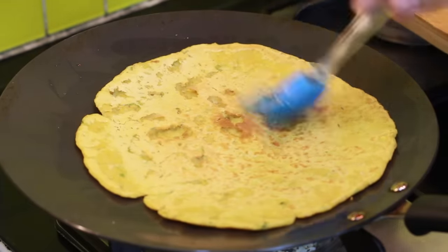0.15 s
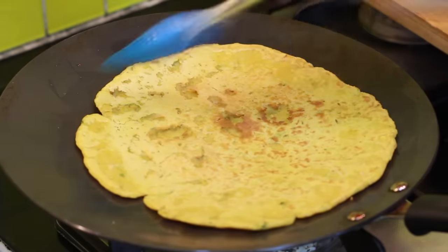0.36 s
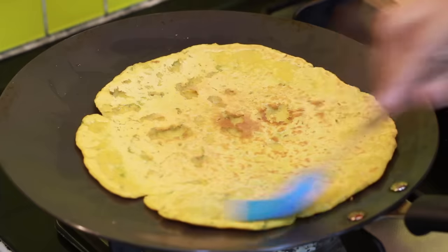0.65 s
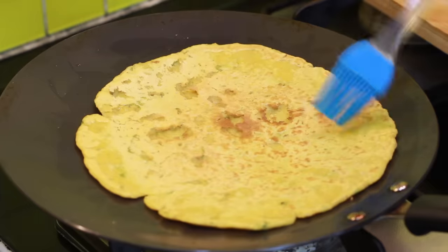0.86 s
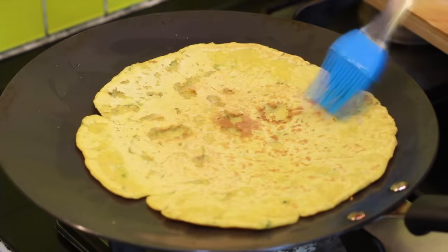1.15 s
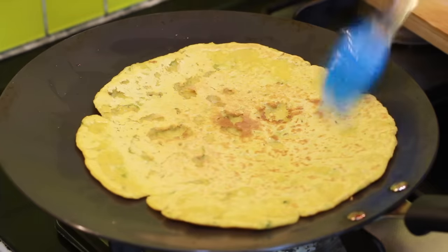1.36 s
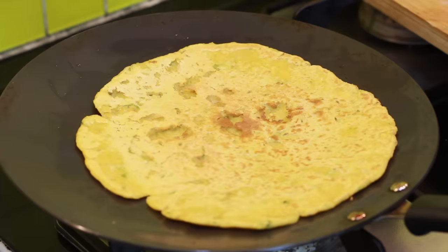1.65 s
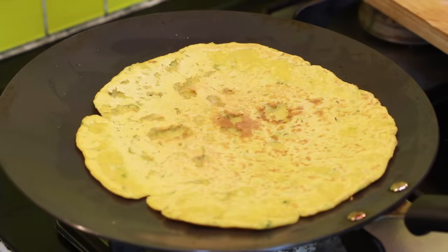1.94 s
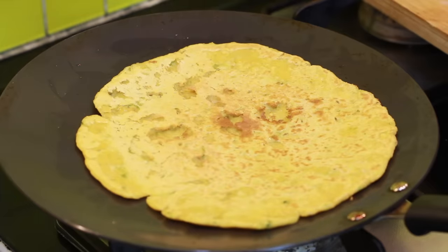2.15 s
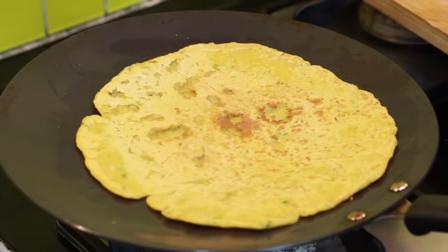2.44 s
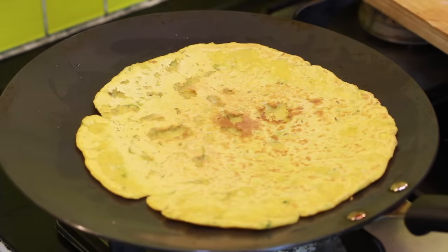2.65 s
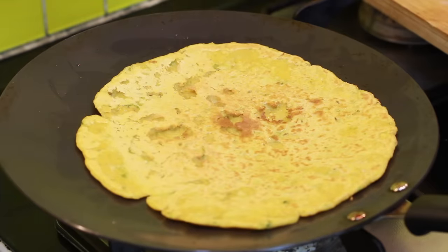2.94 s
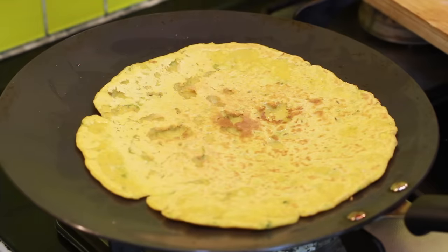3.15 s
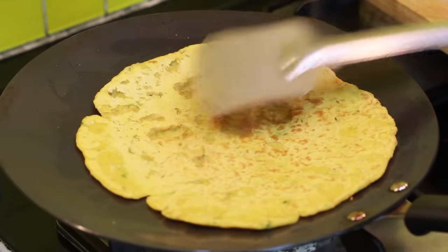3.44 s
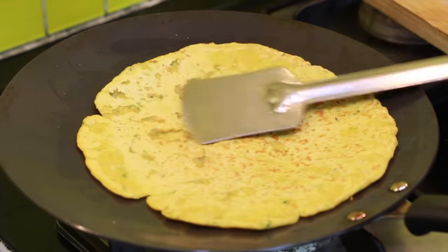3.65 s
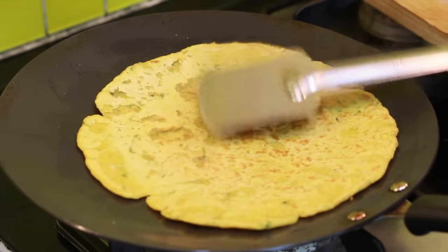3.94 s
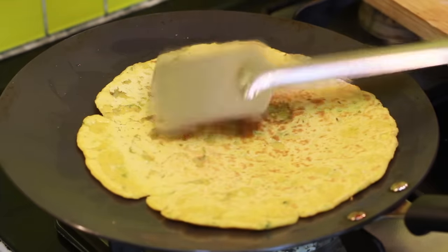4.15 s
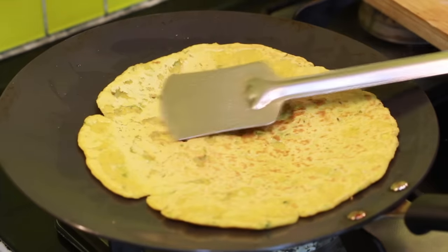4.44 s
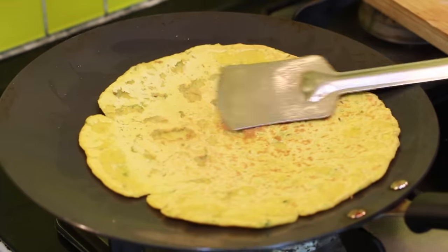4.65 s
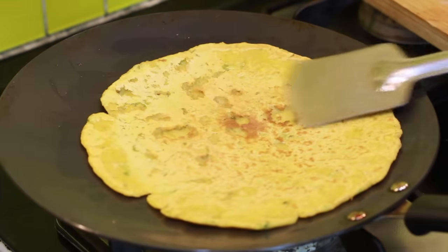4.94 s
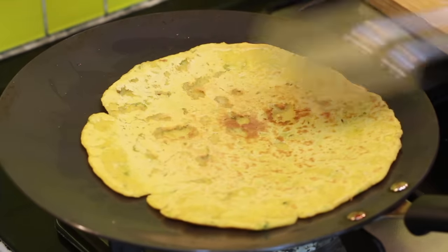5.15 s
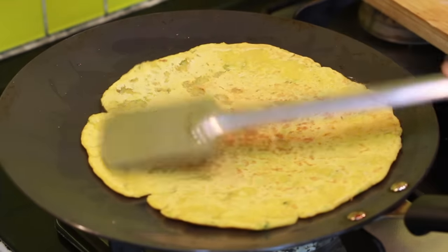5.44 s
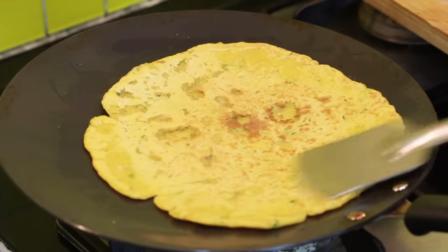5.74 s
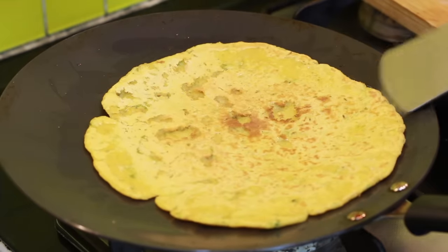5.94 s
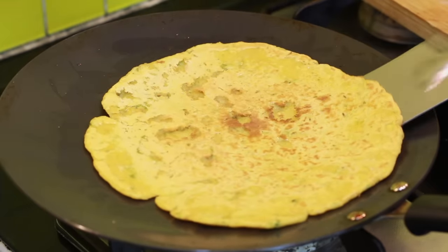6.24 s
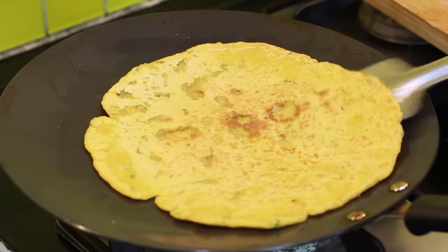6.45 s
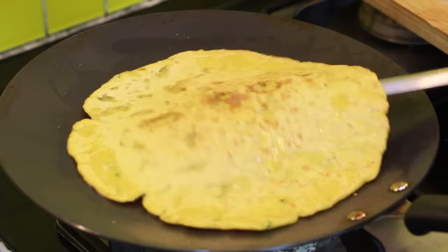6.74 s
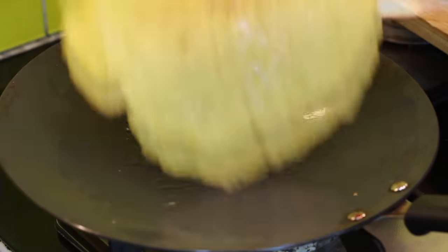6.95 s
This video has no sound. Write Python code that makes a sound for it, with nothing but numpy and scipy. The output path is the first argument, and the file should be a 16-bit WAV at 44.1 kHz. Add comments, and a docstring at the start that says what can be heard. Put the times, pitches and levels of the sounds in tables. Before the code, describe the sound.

Flatbread sizzles softly on an iron griddle; a brush clatters down, a press bursts into harsh overloaded pops, then a steel turner clinks and scrapes.

```python
"""In a kitchen, at a gas stove, flatbread fries on an iron griddle: bursting bubbles make a coloured fizz.
A silicone brush swishes oil on and is put down with a clatter; each blow excites decaying modes.
A steel turner presses the bread: it sizzles and the griddle rocks on its grate; bursts of hiss swell and
cut off, with pops that overload the microphone. The turner then hits the iron and scrapes in
under the bread by stick-slip; random reflections and the burner's noise surround it all."""
import sys
import numpy as np
from scipy import signal
from scipy.fft import rfft, irfft, next_fast_len
from scipy.io import wavfile

SR = 44100
rng = np.random.default_rng(int(sys.argv[2]) if len(sys.argv) > 2 else 0)


def wav_out(sig):
    """Save sig, one row per channel (or a flat mono array), as 16-bit PCM at SR to the path in sys.argv[1]."""
    wavfile.write(sys.argv[1], SR, np.round(np.clip(np.atleast_2d(sig).T, -1, 1) * 32767).astype(np.int16))


N = 312228
TIME = np.arange(N) / SR  # seconds

# Levels are relative: the sources and the room apply further gains. Every spectrum is a density.
# Presses of brush or turner on the bread: [peak_s, level_db, rise_s]
BREAD_PRESSES = [(.48, -57, 0.46), (3.6, -49.5, 0.12), (3.8, -53.5, 0.14), (3.99, -49, 0.13),
                 (4.22, -48, 0.075), (4.45, -50, 0.42), (4.66, -49.5, 0.062), (5.16, -57, 0.17),
                 (5.81, -56, 0.17), (6.3, -58, 0.46), (6.72, -60, .13)]
SIZZLE_FALL = 1.29  # a sizzle dies away this many times slower than it rises
# Spectrum of the frying: [frequency_hz, density_db]
SIZZLE_SPECTRUM = [(24, -35), (40, -7), (126, -4), (188, -1), (260, -2.5), (377, -8.5), (577, -4),
                   (1050, -9.5), (1250, -7.5), (1600, -11.5), (15500, -17)]

# Bursts of hiss that swell and cut off: [end_s, level_db, swell_db_per_s]
HISS_BURSTS = [(0.786, -37, 378), (1.064, -44, 350), (4.75, -21.5, 1494), (4.803, -17, 239)]
# Spectrum of the hiss: [frequency_hz, density_db]
HISS_SPECTRUM = [(60, 1), (400, 4.5), (1500, -0.5), (4000, -3.5), (9000, -5.5), (15500, -5.5)]

# Pressure pops at the microphone: [start_s, height_db, length_ms]
PRESSURE_POPS = [(.7837, -22, 0.35), (1.0644, -18, .41), (4.7286, -6, 0.21), (4.7477, 5, 0.93),
                 (4.7583, -8, 0.54), (4.7662, 13, 2.67), (4.778, 9.5, 0.35), (4.7860, 8.5, 3.77),
                 (4.7973, 12.5, 1.53), (4.8011, 6, 1.1)]
# Spectrum of the noise within a pop: [frequency_hz, density_db]
EDDY_SPECTRUM = [(300, -2), (900, 2.5), (1280, 8.5), (1700, 0.5), (4000, -4.5), (9000, -9), (15000, -13)]
# share of the height in a 1 ms pop; longer pops are more turbulent by this power
TURBULENCE, TURBULENCE_GROWTH = 0.52, 0.21

# Knocks of the griddle rocking on its grate: [start_s, level_db]
GRIDDLE_KNOCKS = [(3.832, -21), (4.459, -16), (4.479, -15), (4.539, -18.5), (4.555, -16.5), (4.612, -21.5),
                  (4.62, -24), (4.679, -25), (4.84, -23.5), (4.897, -28.5), (4.931, -28.5), (4.963, -33.5)]
# a knock loses this many dB per octave of treble for each dB under full strength
ROCK_FULL_DB, ROCK_DULLING = -12.5, 0.36
# Modes of the iron griddle: [frequency_hz, level_db, t60_s]
GRIDDLE_MODES = [(599, -4, 0.25), (904, 1, 0.1), (1439, -6, 0.17), (2240, 1.5, 0.13), (2830, 0, 0.063),
                 (3166, 6, 0.071), (3970, -1.5, 0.073), (4290, -4, 0.11), (5070, 9, 0.052),
                 (5700, -12, 0.087), (7320, -22, .2)]
# Spectrum of a knock: [frequency_hz, density_db]
KNOCK_SPECTRUM = [(50, 6), (250, -1), (900, 2), (1800, -7), (3300, 3.5), (5000, -4), (8000, -6.5),
                  (15000, -22)]

# The turner's edge meets the iron: [start_s, level_db, brightness_db_per_octave]
EDGE_STRIKES = [(5.521, -39, -1), (5.547, -38, -12), (5.576, -32, -6.5), (6.0438, -24, 1),
                (6.0495, -17.5, -0.5), (6.502, -37, 4), (6.836, -38, 4), (6.862, -42, -6)]
# Modes of the steel blade: [frequency_hz, level_db, t60_s]
BLADE_MODES = [(550, 3.5, 0.15), (948, -1, 0.16), (1190, -1.5, 0.19), (2054, -1, 0.24), (2163, -6, .25),
               (4770, 7, 0.16), (5440, -1, 0.086), (7550, 3, 0.19), (7800, -5.5, 0.096), (9065, -21, .3),
               (9900, 2, .14), (10500, -5, .14)]
# Spectrum of a strike: [frequency_hz, density_db]
STRIKE_SPECTRUM = [(35, 5.5), (90, -13), (300, -19), (560, -8), (850, 2), (1050, -22), (1300, -6),
                   (1700, -10), (3000, -8), (5900, -9), (7600, -6), (15500, -14.5)]

# The turner is shoved in under the bread: [peak_s, level_db, rise_s]
TURNER_SHOVES = [(6.283, -39, .022), (6.335, -44.5, .03), (6.533, -39.5, 0.021), (6.581, -39, 0.021),
                 (6.658, -37.5, 0.044)]
SHOVE_FALL = 1.48  # a shove dies away this many times slower than it rises
# Resonances of the sliding blade: [frequency_hz, width_hz, level_db]
SLIDING_MODES = [(1300, 120, -12), (1850, 110, -7), (2060, 150, 3), (2380, 200, -6), (2660, 200, 1),
                 (3260, 260, -1), (3620, 200, -10), (4730, 200, -12), (5680, 400, -13)]
# Resonances of the blade as it skims: [frequency_hz, width_hz, level_db]
SINGING_MODES = [(760, 120, -3), (1949, 90, -3), (4400, 250, -14), (7343, 80, -4), (8400, 300, -14),
                 (9065, 90, -2), (10837, 250, -11)]
# Spectrum of the edge's dry rasp: [frequency_hz, density_db]
GRIT_SPECTRUM = [(500, -27), (2200, -10), (3200, -1), (4300, 0), (5500, 0), (7000, -0.5), (9800, -6.5),
                 (11200, -7), (15000, -13)]
# when the blade lies down on the iron; the gain of its lowest modes before and after
BITE_S, BITE_RISE_S, SKIMMING_DB, BITING_DB = 6.565, 0.012, -18, 3
# the blade skims the bread in one sweep
SKIM_START_S, SKIM_END_S, SKIM_RISE_S, SKIM_RELEASE_S, SKIM_DB = 5.56, 6.104, .08, 0.23, -53

# Bristles swish over the dough: [peak_s, level_db]
BRISTLE_SWISHES = [(.176, -46), (.524, -46)]
SWISH_S, SWISH_HZ, SWISH_OCTAVES = .15, 1180, 0.47
# The flat blade pats the dough: [peak_s, level_db]
BLADE_PATS = [(3.561, -56), (3.957, -40.5), (5.176, -48.5)]
PAT_S, PAT_HZ, PAT_OCTAVES = 0.098, 172, 0.41
SLAP_S, SLAP_HZ, SLAP_OCTAVES, SLAP_DB = .18, 740, 0.72, -8  # the lighter slap that goes with each pat
# The bread drags over the blade: [peak_s, level_db, length_s, centre_hz]
BREAD_DRAGS = [(6.26, -51, 0.16, 1370), (6.625, -46.5, .072, 764)]
DRAG_OCTAVES = 0.4

# The brush is put down in a steel bowl: [start_s, level_db, brightness_db_per_octave]
BRUSH_CLACKS = [(2.2663, -32.5, -13), (2.299, -40, -14), (2.362, -20.5, -4), (2.3764, -36, -14),
                (2.441, -14.5, 3), (2.4472, -26, -8), (2.4823, -30, -2), (2.4943, -20.5, -3),
                (2.5251, -27, 1), (2.586, -33.5, -4)]
# Modes of the brush's plastic handle (near 1.8-2.4 kHz) and of the steel bowl (above 4 kHz): [frequency_hz,
# level_db, t60_s]
CLATTER_MODES = [(1853, 10.5, 0.086), (1950, -5, 0.072), (2260, 2, 0.078), (2326, -12, 0.14), (4740, -5, 0.15),
                 (6340, -9, 0.13)]
# Spectrum of a clack: [frequency_hz, density_db]
CLACK_SPECTRUM = [(40, -6), (200, -30), (750, -14), (1600, -5.5), (1900, 7.5), (2400, 5.5), (2750, -7),
                  (3300, -2), (4300, -7.5), (6500, -13.5), (7900, -12), (9800, -21), (11200, -16),
                  (15500, -26)]

# Dull bumps on the worktop: [start_s, level_db, brightness_db_per_octave]
WORKTOP_BUMPS = [(3.058, -36, -3), (3.104, -40, 0)]
# Modes of the worktop: [frequency_hz, level_db, t60_s]
WORKTOP_MODES = [(292, 0, 0.2), (604, 1.5, 0.2), (770, -12, .12), (1195, 6.5, 0.093)]
# Spectrum of a bump: [frequency_hz, density_db]
BUMP_SPECTRUM = [(250, -3), (1300, -1), (4000, -21)]

# Low-frequency swells at the microphone, under the sharper sounds: [peak_s, level_db]
LOW_SWELLS = [(.788, -49), (2.37, -49), (2.447, -43), (4.815, -29.5)]
LOW_SWELL_S, LOW_SWELL_HZ, LOW_SWELL_OCTAVES = .055, 40, 0.65

# Spectrum of the gas burner and kitchen: [frequency_hz, density_db]
BURNER_SPECTRUM = [(15, -53), (25, -20), (86, -2), (156, -2), (221, -1), (368, -5.5), (399, -3.5),
                   (919, -8), (1020, -10.5), (1110, -8.5), (1200, -10.5), (3000, -14.5), (15500, -22)]
BURNER_DB = -51.5
# Decay time of the room: [frequency_hz, t60_s]
ROOM_DECAY = [(200, 0.51), (2000, 0.26), (6000, 0.21), (15000, 0.23)]
# Gain of the pops into the room: [frequency_hz, gain_db]
BOOM_GAIN = [(100, -18), (300, -17), (1500, -11), (6000, -36)]
BAND_LIMIT_HZ = 15800


def gain_of(db):
    """Logarithmic level: decibels to an amplitude factor."""
    return 10 ** (np.asarray(db) / 20)


def evened(x):
    """Normalisation: scales a signal to rms 1."""
    return x / np.sqrt(np.mean(x ** 2) + 1e-20)


def read(points, hz):
    """Interpolation: a curve joined by straight lines on a log-frequency axis."""
    f, value = np.transpose(points)
    return np.interp(np.log(hz + 1), np.log(f + 1), value)


def add(mix, s, sound):
    """Superposition: adds a sound to the mix at time s."""
    part = mix[max(round(s * SR), 0):][:len(sound)]
    part += sound[:len(part)]


def filtered(x, db_at):
    """Linear filtering: multiplies the spectrum by a gain in dB given as a function of frequency."""
    size = next_fast_len(len(x) + 2048)
    gain = gain_of(db_at(np.fft.rfftfreq(size, 1 / SR)))
    return irfft(rfft(x, size) * gain, size)[:len(x)]


def coloured(x, points):
    """Spectral shaping: filters x by a tabled spectrum, to rms 1."""
    return evened(filtered(x, lambda hz: read(points, hz)))


def wander(per_s):
    """Random modulation: straight lines through per_s random points a second, rms 1."""
    count = int(N / SR * per_s) + 2
    points = rng.standard_normal(size=2048)[:count]
    return evened(np.interp(TIME * per_s, np.arange(count), points))


def hump(count, lean):
    """Smooth envelope: a swell that rises faster than it falls when lean is under 1."""
    return np.sin(np.pi * np.linspace(0, 1, max(count, 4)) ** lean) ** 2


def swells(rows, fall):
    """Addition of powers: efforts grow exponentially and die away `fall` times slower."""
    power = 0
    for s, db, rise_s in rows:
        distance = np.maximum(s - TIME, (TIME - s) / fall)
        power = power + gain_of(db) ** 2 * np.exp(-2 * distance / rise_s)
    return np.sqrt(power)


def grains(per_s, spread_db):
    """Impulsive noise: random clicks, a few larger than the rest."""
    size = gain_of(spread_db * np.minimum(rng.exponential(1, N), 4))
    return evened(size * rng.choice([-1, 1], N) * (rng.random(N) < per_s / SR))


def resonant(x, modes, drift=.012, patchy_db=3.5):
    """Resonance: modes bend and swell, each by itself, as the point of contact travels; rms 1."""
    out = np.zeros(N)
    for hz, width, db in modes:
        pitch_hz = hz + drift * min(hz, 3000) * wander(14)
        turn = np.exp(2j * np.pi * np.cumsum(pitch_hz) / SR)
        r = np.exp(-np.pi * 1.5 * width / SR)
        # smoothing twice keeps the valleys between the resonances dark
        ring = turn * signal.lfilter([(1 - r) ** 2], [1, -2 * r, r * r], x / turn)
        out += gain_of(db + patchy_db * wander(24)) * ring.real
    return evened(out)


def blows(rows, modes, colour, crack_t60, body_t60, body_db, ring_db, level_db):
    """Impact excitation: a crack, a dense short body tail and the object's clear decaying modes."""
    out, t = np.zeros(N), np.arange(SR // 2) / SR
    for s, db, bright_db in rows:
        def tilt(hz):
            return bright_db * np.log2(np.maximum(hz / 2500, 1))

        noise = rng.standard_normal(len(t))
        dense = evened(filtered(noise, lambda hz: read(colour, hz) + tilt(hz)))
        decay = gain_of(-60 * t / crack_t60) + gain_of(body_db - 60 * t / body_t60)
        # the point of contact changes how strongly each mode answers
        shares = rng.uniform(.5, 1.5, len(modes)) * rng.choice([-1, 1], len(modes))
        ring = np.zeros(len(t))
        for share, (hz, mode_db, t60) in zip(shares, modes):
            envelope = gain_of(mode_db + tilt(hz) / 2 - 60 * t / t60)
            ring += share * envelope * np.sin(2 * np.pi * hz * t)
        add(out, s, gain_of(db + level_db) * (dense * decay + gain_of(ring_db) * ring))
    return out


def rub(rows, length_s, centre_hz, octaves, lean=.55):
    """Shaped noise: a hump of noise around a centre frequency for each row [peak_s, level_db]."""
    def band_db(hz):
        distance = np.log2((hz + 1) / centre_hz) / octaves
        return -20 * np.log10(1 + distance ** 2 / 2)

    out, swell = np.zeros(N), hump(round(length_s * SR), lean)
    for s, db in rows:
        noise = filtered(rng.standard_normal(size=16384), band_db)
        noise = evened(np.resize(noise, len(swell)))
        add(out, s - swell.argmax() / SR, gain_of(db) * swell * noise)
    return out


def sizzle(level_db=8.5, idle_db=-72, crackle=0.39):
    """Bubble noise: tiny bubbles burst under the bread; pressing adds to the idle fizz."""
    level = np.hypot(swells(BREAD_PRESSES, SIZZLE_FALL), gain_of(idle_db))
    bubbles = evened(rng.standard_normal(N) + crackle * grains(per_s=3000, spread_db=3.5))
    return gain_of(level_db) * level * coloured(bubbles, SIZZLE_SPECTRUM)


def hiss(cutoff_db_per_s=3500):
    """Amplitude modulation: bursts of coloured noise grow exponentially and stop short."""
    level = 0
    for s, db, swell in HISS_BURSTS:
        drop_db = np.maximum((s - TIME) * swell, (TIME - s) * cutoff_db_per_s)
        level = level + gain_of(db - drop_db)
    return level * coloured(rng.standard_normal(N), HISS_SPECTRUM)


def pops(low_cut_hz=107):
    """Transient pressure: short noisy pulses with a steep front; the low cut swings back after each."""
    out = np.zeros(N)
    swirl = coloured(rng.standard_normal(N), EDDY_SPECTRUM)
    for k, (s, db, ms) in enumerate(PRESSURE_POPS):
        turbulence = TURBULENCE * ms ** TURBULENCE_GROWTH
        push = hump(round(ms * SR / 1000), lean=0.78)
        eddies = swirl[k * N // len(PRESSURE_POPS):][:len(push)]
        eddies = eddies - eddies.mean()
        add(out, s, gain_of(db) * (push + turbulence * np.sqrt(push) * eddies))
    return signal.lfilter(*signal.butter(2, low_cut_hz, "high", fs=SR), out)


def rocking():
    """Damped impact: griddle on grate, duller when gentler; the bread damps the iron, so knocks are dry."""
    knocks = [(s, db, ROCK_DULLING * (db - ROCK_FULL_DB)) for s, db in GRIDDLE_KNOCKS]
    return blows(knocks, GRIDDLE_MODES, KNOCK_SPECTRUM, crack_t60=.019, body_t60=0.092,
                 body_db=-17.5, ring_db=-19, level_db=-6)


def turner_strikes():
    """Modal ringing: the turner's edge hits the iron and the steel blade answers."""
    return blows(EDGE_STRIKES, BLADE_MODES, STRIKE_SPECTRUM, crack_t60=0.072, body_t60=0.24,
                 body_db=-13.0, ring_db=-16.5, level_db=-9.5)


def scrape(grit_db=-2.0, skim_grit_db=-2, low_modes_hz=2400, judder_db=1.5):
    """Stick-slip: the edge catches on the iron's grain in clumps; each slip rings blade and griddle."""
    slips = evened(grains(per_s=2200, spread_db=0.5) + .5 * rng.standard_normal(N))
    slips = slips * gain_of(judder_db * wander(160))
    ring = resonant(slips, SLIDING_MODES, drift=.02, patchy_db=2.5)
    low = signal.sosfiltfilt(signal.butter(4, low_modes_hz, fs=SR, output="sos"), ring)
    grit = coloured(slips, GRIT_SPECTRUM)
    contact = .5 + .5 * np.tanh((TIME - BITE_S) / BITE_RISE_S)
    low_gain = gain_of(SKIMMING_DB + (BITING_DB - SKIMMING_DB) * contact)
    sliding = ring + (low_gain - 1) * low + gain_of(grit_db) * grit
    # under a light touch the blade sings only in snatches
    singing = resonant(slips, SINGING_MODES, drift=.015, patchy_db=4.5)
    rise = (TIME - SKIM_START_S) / SKIM_RISE_S
    release = (SKIM_END_S - TIME) / SKIM_RELEASE_S
    sweep = np.clip(np.minimum(rise, release), 0, 1)
    skimming = gain_of(SKIM_DB) * sweep * (singing + gain_of(skim_grit_db) * grit)
    return swells(TURNER_SHOVES, SHOVE_FALL) * sliding + skimming


def dough():
    """Soft contact: bristles swish over the bread, the flat blade pats it, and it drags over the steel."""
    swishes = rub(BRISTLE_SWISHES, SWISH_S, SWISH_HZ, SWISH_OCTAVES)
    pats = rub(BLADE_PATS, PAT_S, PAT_HZ, PAT_OCTAVES)
    slaps = gain_of(SLAP_DB) * rub(BLADE_PATS, SLAP_S, SLAP_HZ, SLAP_OCTAVES)
    drags = sum(rub([(s, db)], length_s, hz, DRAG_OCTAVES) for s, db, length_s, hz in BREAD_DRAGS)
    return swishes + pats + slaps + drags


def brush_clatter():
    """Modal ringing: the brush is put down; its plastic handle and the steel bowl answer each clack."""
    return blows(BRUSH_CLACKS, CLATTER_MODES, CLACK_SPECTRUM, crack_t60=0.023, body_t60=.08,
                 body_db=-19.5, ring_db=-15.0, level_db=-5.0)


def worktop_bumps():
    """Low modal response: dull bumps excite the worktop."""
    return blows(WORKTOP_BUMPS, WORKTOP_MODES, BUMP_SPECTRUM, crack_t60=.04, body_t60=.1,
                 body_db=-13, ring_db=-4, level_db=-10.5)


def low_swells():
    """Band-limited noise: low-frequency swells at the microphone, under the sharper sounds."""
    return rub(LOW_SWELLS, LOW_SWELL_S, LOW_SWELL_HZ, LOW_SWELL_OCTAVES)


def burner():
    """Stationary noise: the steady soft roar of the gas flame and the kitchen."""
    return gain_of(BURNER_DB) * coloured(rng.standard_normal(N), BURNER_SPECTRUM)


def kitchen(x, gap_s=.006):
    """Reverberation: random reflections off tiles and worktop; the treble dies sooner than the bass."""
    t = np.arange(SR // 2) / SR
    taps = rng.choice([-1., 1.], len(t)) * (rng.random(len(t)) < 3000 / SR) * (t > gap_s)
    hz, at, bands = signal.stft(taps, SR, nperseg=256)
    t60 = read(ROOM_DECAY, hz)
    tail = signal.istft(bands * gain_of(-60 * at / t60[:, None]), SR, nperseg=256)[1]
    return signal.fftconvolve(x, tail / np.linalg.norm(tail))[:N]


def scene():
    """Superposition of direct and reverberant sound: everything at the stove, with the room around it."""
    bursts, blasts = hiss(), pops()
    stove = rocking() + turner_strikes() + worktop_bumps() + scrape() + dough()
    clacks = brush_clatter()
    boom = filtered(blasts, lambda hz: read(BOOM_GAIN, hz))
    to_room = gain_of(-6.5) * stove + gain_of(-1) * clacks
    to_room = to_room + gain_of(-16.5) * bursts + gain_of(-32.0) * boom
    direct = sizzle() + bursts + blasts + stove + clacks + low_swells() + burner()
    return (direct + kitchen(to_room))[None]


def record(dry, ceiling=1.0):
    """Overload: the input clips at full scale; a low-pass then limits the band."""
    clipped = np.clip(dry, -ceiling, ceiling)
    low_pass = signal.firwin(511, BAND_LIMIT_HZ, window=("kaiser", 9), fs=SR)
    return signal.oaconvolve(clipped, low_pass[None], "same")


dry = scene()
out = record(dry)
wav_out(out)
```